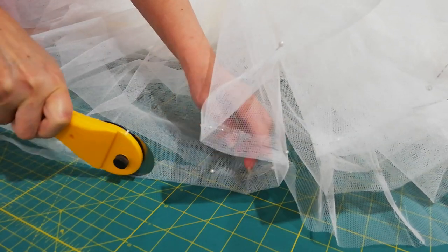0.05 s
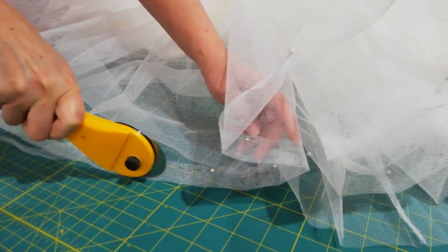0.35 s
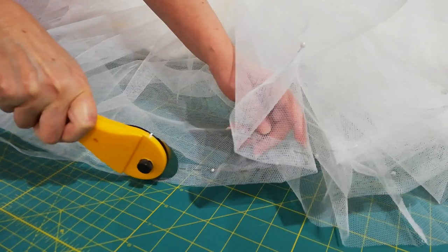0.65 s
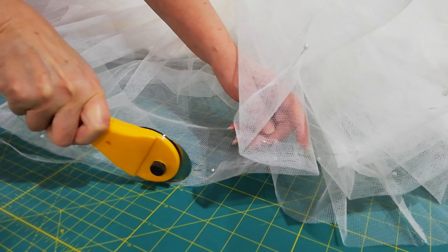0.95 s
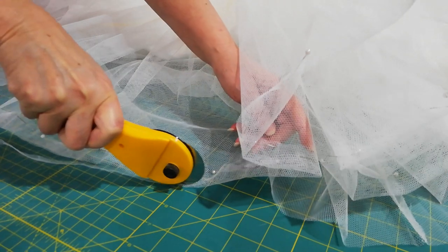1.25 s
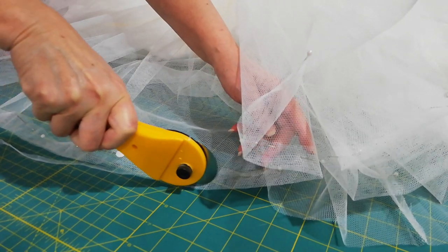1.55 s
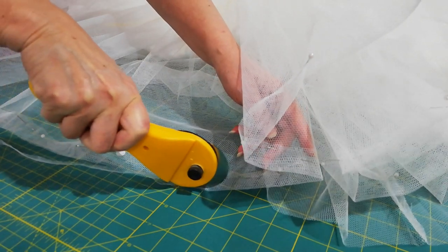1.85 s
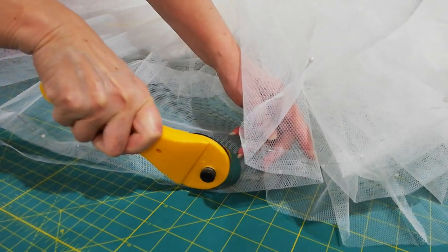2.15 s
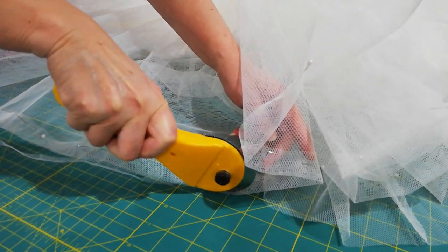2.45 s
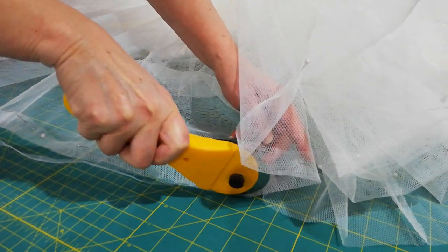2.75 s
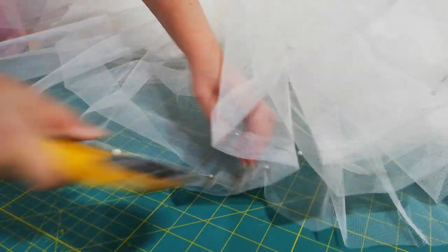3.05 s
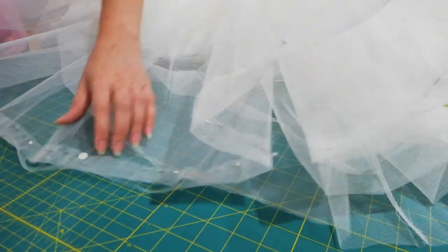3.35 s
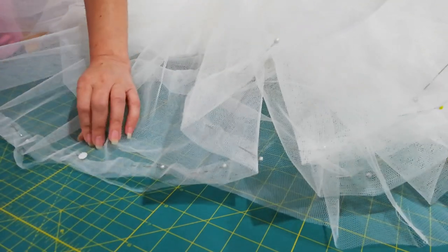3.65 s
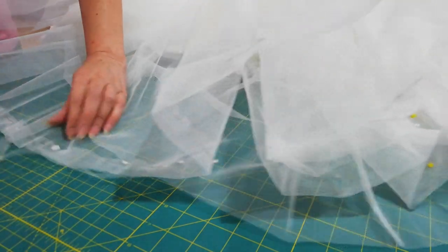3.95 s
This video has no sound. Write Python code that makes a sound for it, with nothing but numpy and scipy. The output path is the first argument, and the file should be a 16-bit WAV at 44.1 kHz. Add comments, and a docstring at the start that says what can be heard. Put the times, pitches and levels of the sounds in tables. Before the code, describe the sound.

In a small quiet room with a faint hum, a rotary blade crunches through net fabric with tiny snaps and an occasional knock. The stiff net then rustles under a patting hand, and the plastic cutter lands with a clatter.

```python
"""A fine crunch, a low rumble and threads snapping one by one: a rotary cutter rolls slowly through tulle
on a cutting mat, jolting now and then. The blade lifts and a hand sweeps the stiff net aside, its meshes
catching in a dense crackle. The cutter is put down with a clatter that rings the table top.
Small quiet room with a faint low hum; two microphones, the left one ringing in the high treble."""
import sys
import numpy as np
from scipy import signal
from scipy.fft import rfft, irfft
from scipy.io import wavfile

SR = 44100
rng = np.random.default_rng(int(sys.argv[2]) if len(sys.argv) > 2 else 0)


def generate_wav(sig):
    """Save sig (samples, or channels by samples) to the path in sys.argv[1] as 16-bit PCM at SR."""
    pcm = np.round(np.clip(np.atleast_2d(sig).T, -1, 1) * 32767).astype(np.int16)
    wavfile.write(sys.argv[1], SR, pcm)


N = 176400

# Table top resonances. Each row: frequency in Hz, relative level in dB, T60 in seconds.
TABLE_TOP_MODES = [(126, 17.5, 0.21), (182.7, 12, 0.13), (215.7, 0, 0.46), (311.4, -5.5, 0.46),
                   (380, -6.5, 0.6), (694, -9, 0.27), (870, -8, 0.26), (870, -3, 0.25), (965, -22, 0.3),
                   (1085, -7.5, 0.31), (1400, -2, 0.53)]
# Spectrum of the plastic cutter knocking. Each row: frequency in Hz, relative gain in dB.
CLACK_SPECTRUM = [(100, -22.5), (500, -2.5), (700, 6), (950, 8.5), (1400, 3), (2000, -6), (2800, 1),
                  (4000, -19), (6500, -12), (10000, -21.5), (16000, -61)]
THUD_GAIN_DB, CLACK_DECAY_S = 20.5, 0.0014


def amp(db):
    """Decibels to gain."""
    return 10 ** (np.asarray(db) / 20)


def curve(rows, column=1):
    """Gain over time from rows of seconds and dB."""
    rows = np.array(rows)
    return amp(np.interp(np.arange(N) / SR, rows[:, 0], rows[:, column]))


def response(spectrum, column=1):
    """Minimum-phase impulse response from rows of Hz and dB."""
    size = 4096
    rows = np.array(spectrum)
    hz = np.maximum(np.arange(size // 2 + 1) * SR / size, 1)
    gain = amp(np.interp(np.log(hz), np.log(rows[:, 0]), rows[:, column]))
    cepstrum = irfft(np.log(gain))
    cepstrum[1:size // 2] *= 2
    cepstrum[size // 2 + 1:] = 0
    return irfft(np.exp(rfft(cepstrum)))


def convolve(x, impulse):
    """Filter each channel, cut to N samples."""
    return signal.fftconvolve(np.atleast_2d(x), np.atleast_2d(impulse), axes=1)[:, :N]


def colour(x, spectrum):
    """Shape the spectrum at unit power gain for white noise."""
    impulse = response(spectrum)
    return convolve(x, impulse / np.linalg.norm(impulse))


def diffuse(size, spacing_m=0.27):
    """Noise from all sides at two microphones: alike in the bass, unrelated above."""
    mid, side = rfft(rng.standard_normal((2, size)))
    hz = np.arange(len(mid)) * SR / size
    coherence = np.sinc(2 * hz * spacing_m / 343)
    mid, side = mid * np.sqrt((1 + coherence) / 2), side * np.sqrt((1 - coherence) / 2)
    return irfft(np.array([mid + side, mid - side]), size)


def room(x, wet_db):
    """Direct sound, a bounce off the table and a short tail whose treble dies first."""
    mic_lag_s, bounce_s, bounce_db = 0.0002, 0.0042, -25.5
    t = np.arange(SR // 2) / SR
    low = signal.sosfilt(signal.butter(2, 2500, fs=SR, output="sos"), diffuse(len(t)))
    high = signal.sosfilt(signal.butter(2, 2500, "high", fs=SR, output="sos"), diffuse(len(t)))
    onset = 1 - np.exp(-t / 0.0011)
    low_fade, high_fade = (onset * amp(-60 * t / t60_s) for t60_s in (0.65, 0.15))
    impulse = (low * low_fade + high * high_fade) * amp(wet_db) / np.linalg.norm(low_fade)
    for mic, lag_s in enumerate((0, mic_lag_s)):
        impulse[mic, int(lag_s * SR)] += 1
        impulse[mic, int((bounce_s + 2 * lag_s) * SR)] += amp(bounce_db)
    return convolve(x, impulse)


def bursts(starts_s, levels_db, decay_s, hold_s=0, coherence=1, tones_hz=()):
    """Stereo noise bursts, each with an optional resonance; level is the rms with the energy in 4 ms."""
    t = np.arange(SR // 20) / SR
    envelope = np.exp(-np.maximum(t - hold_s, 0) / decay_s) * (1 - np.exp(-t / 0.00027))
    out = np.zeros((2, N + len(t)))
    for k, (left, unrelated) in enumerate(rng.standard_normal((len(starts_s), 2, len(t)))):
        right = coherence * left + np.sqrt(1 - coherence ** 2) * unrelated
        burst = np.array([left, right]) * envelope
        if len(tones_hz):
            burst += amp(3) * signal.lfilter(*signal.iirpeak(tones_hz[k], Q=4, fs=SR), burst)
        burst *= np.sqrt(0.004 * SR) / np.linalg.norm(burst, axis=1, keepdims=True)
        start = int(np.clip(starts_s[k] * SR, 0, N))
        out[:, start:start + len(t)] += burst * amp(levels_db[k])
    return out[:, :N]


def blows(starts_s, levels_db):
    """One impulse at each start."""
    out = np.zeros(N)
    out[(starts_s * SR).astype(int)] = amp(levels_db)
    return out


def crackle(per_s, spread_db):
    """Random clicks, mostly weak, a few strong, with random polarity at each microphone; rms 1."""
    strength = amp(spread_db * np.minimum(rng.exponential(size=N), 4))
    clicks = (rng.random(N) < per_s / SR) * strength * rng.choice([-1, 1], (2, N))
    return clicks / np.std(clicks)


def wander(per_s):
    """Straight ramps between random values, spread near 1."""
    position = np.arange(N) / SR * per_s
    return np.interp(position, np.arange(N // 100), rng.standard_normal(N // 100))


def ringing(modes):
    """Fading sines of a struck body, unit energy."""
    t = np.arange(SR) / SR
    ring = sum(amp(db - 60 * t / t60_s) * np.sin(2 * np.pi * hz * t) for hz, db, t60_s in modes)
    return ring / np.linalg.norm(ring)


def through_handle(contact, spectrum):
    """A contact sound plus the ring it excites in the plastic handle."""
    # Each row: frequency in Hz, relative level in dB, T60 in seconds.
    handle_modes = [(1000, 2, 0.069), (1053, 14, .08), (1207, 6, 0.054), (1304, 5, 0.042),
                    (1480, 2.5, 0.056), (1890, 4, 0.042), (2106, 1.5, 0.033), (2494, -0.5, 0.037),
                    (2935, -3, 0.094)]
    return colour(contact, spectrum) + convolve(contact, ringing(handle_modes)) * amp(-4)


def on_table(thud, clack):
    """A round thud and a sharp contact; both set the table top ringing."""
    ring = convolve(thud * amp(-13) + clack * amp(-1.5), ringing(TABLE_TOP_MODES))
    return ring + room(thud, wet_db=-1) + room(clack, wet_db=-4.5)


def wheel():
    """The blade crunches into the mat with the pressure on it, then lifts; the table rumbles throughout."""
    # Each row: time in seconds, relative level in dB.
    crunch_levels = [(0, -59), (.15, -61.5), (.3, -64), (.45, -53.5), (.54, -59), (.66, -63.5), (.84, -59),
                     (.95, -59), (1.1, -62.5), (1.45, -60), (1.64, -59), (1.8, -66), (2.05, -61),
                     (2.14, -62), (2.3, -63.5), (2.48, -54), (2.7, -65), (2.79, -67), (2.93, -64)]
    rumble_levels = [(0, -79), (.45, -60), (.7, -65.5), (1.13, -57.5), (1.28, -61.5), (1.65, -55.5),
                     (1.95, -62.5), (2.15, -56.5), (2.4, -61), (2.8, -62), (3.05, -59), (3.3, -66.5),
                     (4, -61.5)]
    # Each row: frequency in Hz, relative gain in dB.
    crunch_spectrum = [(60, -25), (250, -11.5), (550, -6), (1050, 2.5), (1650, -1.5), (2900, -5.5),
                       (5000, -7.5), (6500, -15.5), (11000, -12.5), (16000, -16)]
    rumble_spectrum = [(20, -1), (45, 9), (80, 5.5), (130, 2), (190, 1.5), (300, -20), (600, -36),
                       (2000, -57)]
    pressed = np.arange(N) / SR < crunch_levels[-1][0]
    grains = crackle(per_s=1000, spread_db=4) * curve(crunch_levels) * pressed
    grains *= amp(-2.5 + 4 * wander(per_s=60))
    crunch = room(through_handle(grains, crunch_spectrum), wet_db=-2.5)
    rumble = colour(diffuse(N), rumble_spectrum) * curve(rumble_levels)
    return crunch + rumble


def wavering_tone(hz):
    """A sine whose pitch and level drift at random."""
    phase = 2 * np.pi * np.cumsum(hz * (1 + 0.025 * wander(per_s=14))) / SR
    return np.sqrt(2) * np.sin(phase) * amp(3 * wander(per_s=16) - 1)


def background():
    """Still air, a low hum of two wavering tones and a faint steady drone above them."""
    # Each row: time in seconds, relative levels of the lower and the upper tone in dB.
    hum_levels = [(0, -66.5, -86), (1.2, -75, -75), (1.4, -69, -55), (1.7, -59, -60), (2.1, -70, -57),
                  (2.45, -64, -57.5), (2.62, -52.5, -68), (2.95, -59.5, -61), (3.2, -66, -58),
                  (4, -79, -63.5)]
    # Each row: frequency in Hz, relative gain in dB.
    air_spectrum = [(20, 3), (60, -11.5), (130, 3), (170, -3.5), (230, -1), (330, -3), (500, -20.5),
                    (1000, -17), (2000, -13), (4500, -24.5), (7000, -28), (11000, -21.5), (16000, -24)]
    lower_hz, upper_hz, drone_hz = 80.8, 107.8, 230.6
    hum = wavering_tone(lower_hz) * curve(hum_levels, column=1)
    hum += wavering_tone(upper_hz) * curve(hum_levels, column=2)
    drone = np.sqrt(2) * np.sin(2 * np.pi * drone_hz * np.arange(N) / SR) * amp(-71)
    air = colour(diffuse(N), air_spectrum) * amp(-61.5)
    return hum + drone + air


def snap(starts_s, levels_db):
    """Threads part in tiny bursts, each favouring a pitch of its own."""
    tones_hz = rng.uniform(4720, 14340, len(starts_s))
    return bursts(starts_s, levels_db, decay_s=0.00075, hold_s=0.00012, coherence=0.088, tones_hz=tones_hz)


def threads():
    """Each thread snaps, recoils and lets the blade tap the mat; finer fibres tick in between."""
    # Each row: start in seconds, relative levels of the snap and the tap in dB.
    cuts = [(0.0268, -37.5, -61), (0.0552, -38, -53), (0.0763, -38, -52), (0.0988, -34, -72),
            (0.129, -39, -46.5), (0.1625, -41.5, -55), (0.217, -40.5, -76), (0.324, -40, -53),
            (0.359, -45, -53), (0.3851, -44.5, -44), (0.4175, -45, -36), (0.4387, -40, -39),
            (0.4782, -42, -71), (0.4995, -57, -43.5), (0.509, -37, -44), (0.542, -40.5, -44.5),
            (0.5886, -37.5, -55), (0.6275, -42.5, -47.5), (0.6749, -43.5, -43), (0.723, -42.5, -44),
            (0.7642, -40.5, -45.5), (0.7904, -39, -40.5), (0.822, -41, -73), (0.8352, -50, -43.5),
            (0.864, -47.5, -41), (0.8981, -53, -50), (0.9403, -49.5, -44.5), (0.984, -36.5, -55),
            (1.0212, -47, -45.5), (1.038, -36, -44.5), (1.0495, -37, -46), (1.0737, -30, -43.5),
            (1.092, -50, -50), (1.1187, -46, -46), (1.1356, -37, -42.5), (1.172, -36.5, -42.5),
            (1.2218, -53, -40), (1.2523, -34.5, -70), (1.2964, -43, -45), (1.3334, -42, -46),
            (1.365, -43.5, -46), (1.3694, -43, -51), (1.4052, -41, -73), (1.4413, -41.5, -74),
            (1.4737, -52, -46), (1.5167, -48, -41), (1.5695, -41, -43), (1.608, -41, -41.5),
            (1.636, -39.5, -47), (1.668, -39.5, -44.5), (1.714, -43, -59), (1.7459, -41, -48.5),
            (1.8339, -37.5, -41.5), (1.8911, -42, -44), (1.9185, -36.5, -44), (1.9523, -38, -46),
            (1.982, -38.5, -43), (2.0241, -39.5, -45), (2.062, -42, -44), (2.116, -47, -38.5),
            (2.1364, -47, -33.5), (2.191, -45, -44.5), (2.2491, -44.5, -50), (2.2708, -42, -40.5),
            (2.301, -42.5, -50), (2.3245, -39.5, -43.5), (2.3554, -43, -46.5), (2.4026, -38.5, -49),
            (2.4196, -45, -44), (2.4471, -39, -43.5), (2.4662, -37, -45), (2.5071, -45.5, -55),
            (2.5423, -48, -39.5), (2.5649, -37.5, -68), (2.5958, -39, -45.5), (2.621, -39, -46),
            (2.6507, -40, -41), (2.6981, -35.5, -45), (2.7252, -37, -49), (2.7683, -40.5, -80),
            (2.8888, -47, -49)]
    # Each row: frequency in Hz, relative gain in dB.
    snap_spectrum = [(500, -4.5), (3000, -13), (4800, -9.5), (6000, -4.5), (7500, -1.5), (9000, 2),
                     (11000, 3.5), (13500, -2), (16000, -2)]
    mat_spectrum = [(150, -28), (550, -17), (1050, 9), (1650, -3), (2500, 0), (4000, -10.5), (7000, -14),
                    (16000, -21.5)]
    starts_s, snap_db, tap_db = np.array(cuts).T
    snaps = snap(starts_s, snap_db - 7.5)
    recoil_lag_s = 0.0044 * (0.5 + rng.exponential(size=len(starts_s)))
    recoils = snap(starts_s + recoil_lag_s, snap_db - 21.5)
    fibre_starts_s = rng.uniform(0, starts_s[-2], size=85)
    fibres = snap(fibre_starts_s, rng.normal(-59, 3.5, len(fibre_starts_s)))
    parting = colour(snaps + recoils + fibres, snap_spectrum)
    taps = bursts(starts_s, tap_db - 4, decay_s=0.0029, coherence=0.38)
    return room(parting, wet_db=-8.5) + room(through_handle(taps, mat_spectrum), wet_db=-1.5)


def jolts():
    """The cutter jolts on the mat: its handle knocks and a soft push rings the table's lowest modes."""
    # Each row: start in seconds, relative levels of the table thump and the handle knock in dB.
    hits = [(1.12, -46, -50.5), (2.466, -40, -35.5), (2.4787, -33, -49), (2.9554, -47.5, -45.5)]
    starts_s, thump_db, knock_db = np.array(hits).T
    push_s = 0.0025
    t = np.arange(SR // 20) / SR
    push = np.sin(np.pi * np.minimum(t / push_s, 1)) ** 2
    force = convolve(blows(starts_s, thump_db + THUD_GAIN_DB), push / push.sum())
    thumps = 2 * convolve(force, ringing(TABLE_TOP_MODES))
    knocks = bursts(starts_s, knock_db, CLACK_DECAY_S, coherence=0.8)
    return thumps + room(through_handle(knocks, CLACK_SPECTRUM), wet_db=-4)


def net():
    """Meshes of the swept net catch on each other in a dense crackle; now and then a fold flicks over."""
    # Each row: time in seconds, relative level in dB.
    rustle_levels = [(2.94, -64), (2.97, -52), (3.04, -66), (3.11, -57.5), (3.2, -53), (3.27, -64.5),
                     (3.39, -56.5), (3.47, -55.5), (3.5, -42.5), (3.59, -35.5), (3.64, -51), (3.7, -50.5),
                     (3.78, -46.5), (3.83, -34.5), (3.87, -36.5), (3.91, -38), (4, -37)]
    # Each row: start in seconds, relative level in dB, left minus right in dB.
    folds = [(2.968, -45.5, 6), (3.008, -46.5, 2), (3.104, -49, -2), (3.132, -53.5, 2), (3.407, -52, 0),
             (3.4119, -44.5, -13), (3.527, -45.5, 4), (3.584, -41.5, 0), (3.654, -45, 2),
             (3.719, -45.5, -0.5), (3.766, -43.5, 1), (3.812, -44, 8)]
    # Each row: frequency in Hz, relative gain in dB.
    rustle_spectrum = [(60, -27), (250, 2), (800, 4.5), (1600, -4), (3000, -6), (4200, -2.5), (5500, -5.5),
                       (7500, -8), (11500, 1.5), (13500, -11), (16000, -4.5)]
    flick_spectrum = [(500, -45), (2000, -24), (3400, -1), (4200, 6.5), (5500, -2.5), (8500, -2),
                      (11500, 5), (16000, -20)]
    moving = np.arange(N) / SR > rustle_levels[0][0]
    grains = crackle(per_s=8300, spread_db=5) * curve(rustle_levels) * moving
    grains *= amp(-6.5 + 2.85 * wander(per_s=90))
    starts_s, flick_db, pan_db = np.array(folds).T
    flicks = [bursts(starts_s, flick_db + side * pan_db / 2, decay_s=0.0016)[0] for side in (1, -1)]
    rustle = room(colour(grains, rustle_spectrum), wet_db=2)
    return rustle + room(colour(flicks, flick_spectrum), wet_db=2.5)


def palm():
    """The palm lands on the net with a dull thud and a light slap of skin."""
    # Each row: start in seconds, relative levels of the thud and the slap in dB.
    pats = [(3.4801, -30.5, -34.5), (3.4929, -31, -50), (3.546, -39, -60), (3.587, -36, -45),
            (3.722, -39.5, -47.5)]
    # Each row: frequency in Hz, relative gain in dB.
    thud_spectrum = [(60, -27), (130, -6.5), (220, 2), (310, 1.5), (450, -8), (700, -18), (2000, -53)]
    slap_spectrum = [(700, -10), (1400, 2.5), (2500, -2), (3200, 4.5), (4500, -7.5), (16000, -21.5)]
    starts_s, thud_db, slap_db = np.array(pats).T
    thuds = colour(blows(starts_s, thud_db + THUD_GAIN_DB), thud_spectrum)
    slaps = colour(bursts(starts_s, slap_db, CLACK_DECAY_S, coherence=0.53), slap_spectrum)
    return on_table(thuds, slaps)


def finger_slide():
    """The regular mesh gives a sliding finger a narrow-band rasp."""
    # Each row: frequency in Hz, relative gain in dB.
    rasp_spectrum = [(1000, -27), (3300, -8), (4150, 8), (4900, -7), (8000, -32), (16000, -31)]
    peak_s, width_s = 3.59, 0.027
    swell = amp(-42.5) * np.exp(-((np.arange(N) / SR - peak_s) / width_s) ** 2)
    return room(colour(crackle(per_s=5200, spread_db=6) * swell, rasp_spectrum), wet_db=-3)


def blade_swish():
    """The flat of the blade brushes the net as it lifts away: a quick catch, then a fading slide."""
    # Each row: frequency in Hz, relative gain in dB.
    swish_spectrum = [(500, -22), (1600, 6), (6000, -6), (11500, 5), (16000, -21)]
    start_s, attack_s, fade_to_half_s = 3.6, 0.0025, 0.057
    t = np.maximum(np.arange(N) / SR - start_s, 0)
    swell = amp(-49) * (1 - np.exp(-t / attack_s)) * 0.5 ** ((t / fade_to_half_s) ** 2)
    return room(colour(crackle(per_s=1000, spread_db=4) * swell, swish_spectrum), wet_db=-8.5)


def clatter():
    """The plastic cutter lands on the table and bounces."""
    # Each row: start in seconds, relative levels of the thud and the clack in dB.
    landings = [(3.8243, -29, -26.5), (3.8337, -29.5, -20.5), (3.8387, -27.5, -33.5), (3.861, -54, -32),
                (3.926, -49, -46)]
    # Each row: frequency in Hz, relative gain in dB.
    thud_spectrum = [(30, -87), (80, 3), (130, -10), (175, -1.5), (220, 1), (300, 0.5), (450, -14),
                     (800, -15), (1500, -82)]
    starts_s, thud_db, clack_db = np.array(landings).T
    thuds = colour(blows(starts_s, thud_db + THUD_GAIN_DB), thud_spectrum)
    clacks = colour(bursts(starts_s, clack_db, CLACK_DECAY_S, coherence=0.11), CLACK_SPECTRUM)
    return on_table(thuds, clacks)


def scene():
    """Everything at the cutting table; small objects radiate no deep bass."""
    bass_cut = signal.butter(4, 98, "high", fs=SR, output="sos")
    small_sources = threads() + jolts() + net() + palm() + finger_slide() + blade_swish() + clatter()
    return wheel() + background() + signal.sosfilt(bass_cut, small_sources)


def record(dry):
    """Each microphone adds its colour; a steep low-pass cuts the top."""
    # Each row: frequency in Hz, left gain in dB, right gain in dB.
    mic_spectra = [(99, -0.5, -1), (362, 0.5, 1.5), (820, -2, -5), (2440, 0, -2.5), (3770, 3.5, 2),
                   (6420, 5, 3), (9450, 11.5, -4), (10030, 14, 1.5), (10690, 4.5, -8), (13300, -3, 4),
                   (15400, -2, -30)]
    top_hz = 15900
    heard = convolve(dry, [response(mic_spectra, column=1), response(mic_spectra, column=2)])
    return signal.sosfilt(signal.ellip(10, 0.2, 80, top_hz, fs=SR, output="sos"), heard)


dry = scene()
out = record(dry)
generate_wav(out)
```